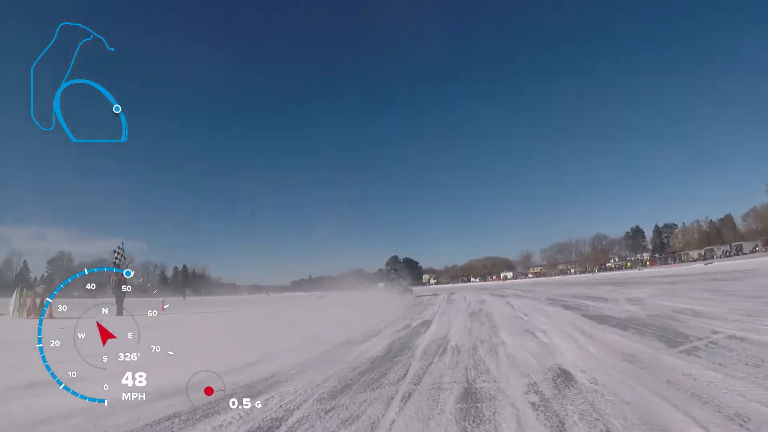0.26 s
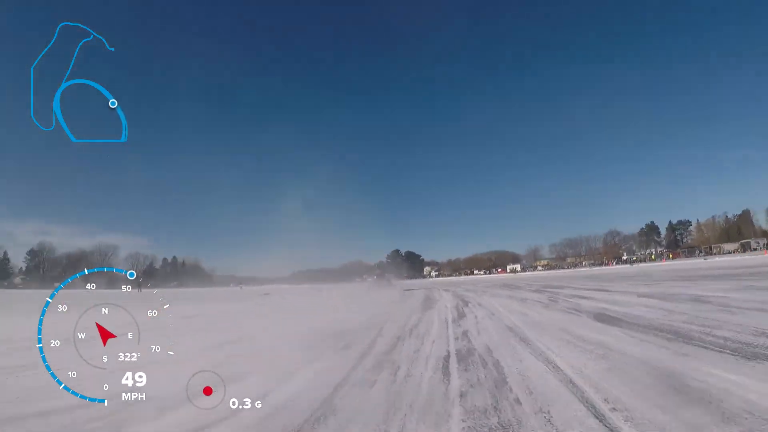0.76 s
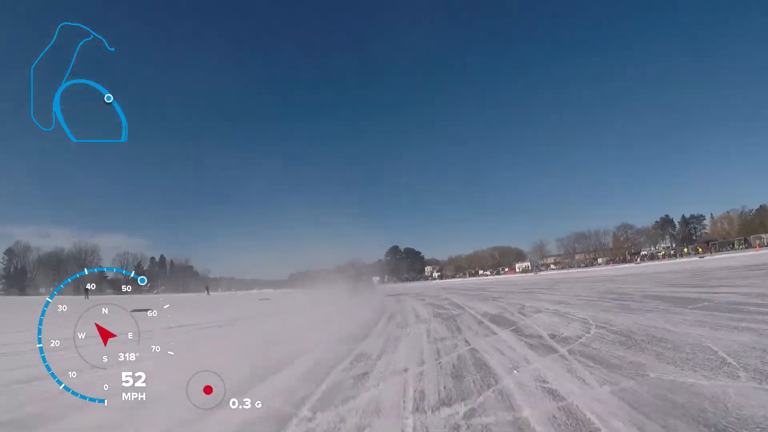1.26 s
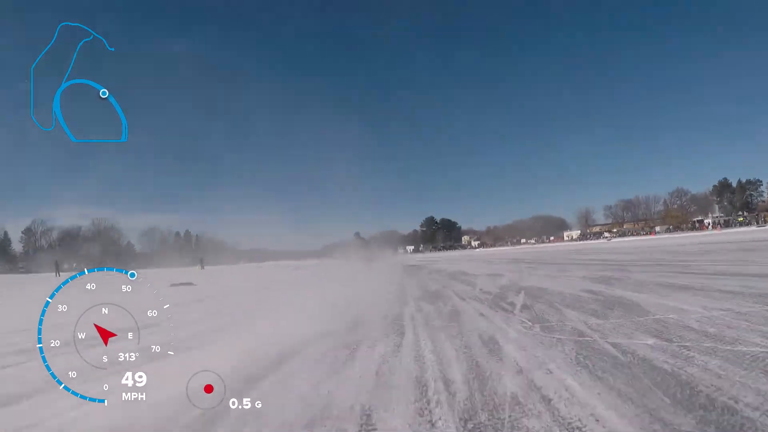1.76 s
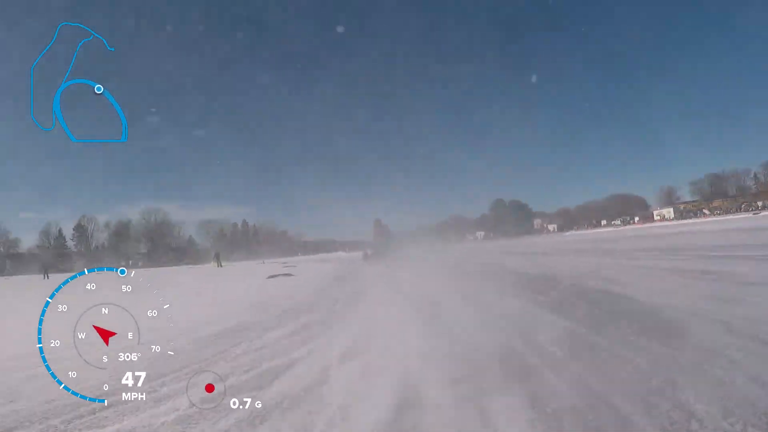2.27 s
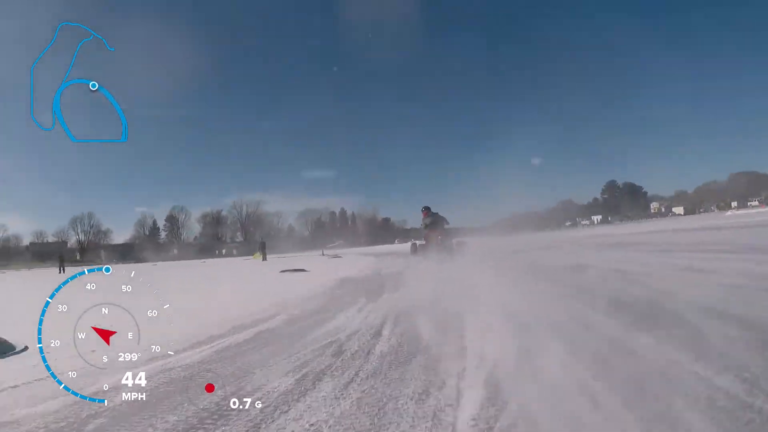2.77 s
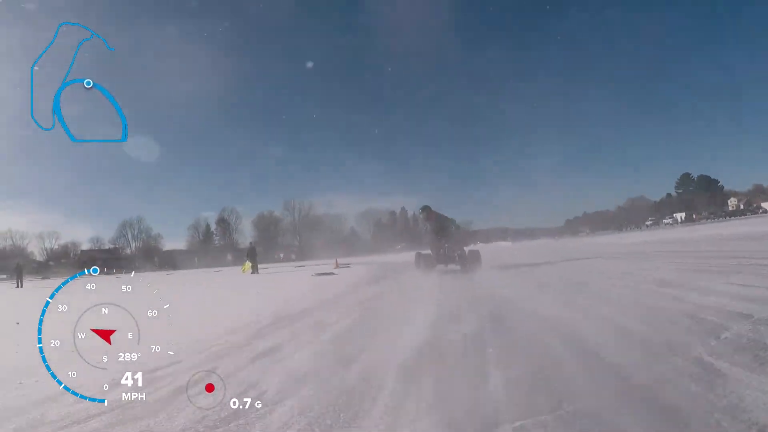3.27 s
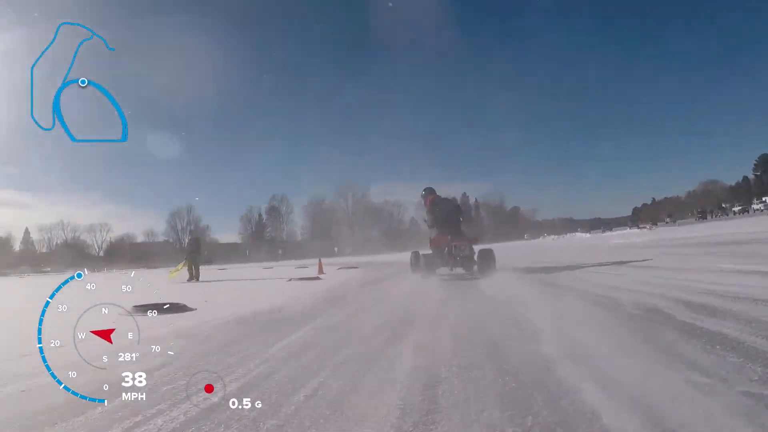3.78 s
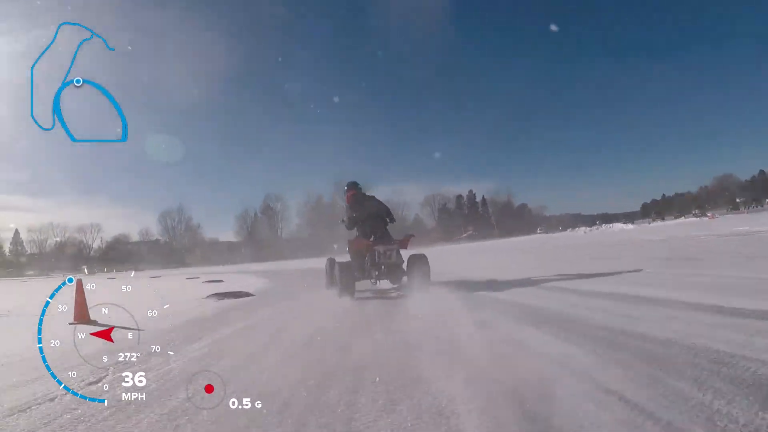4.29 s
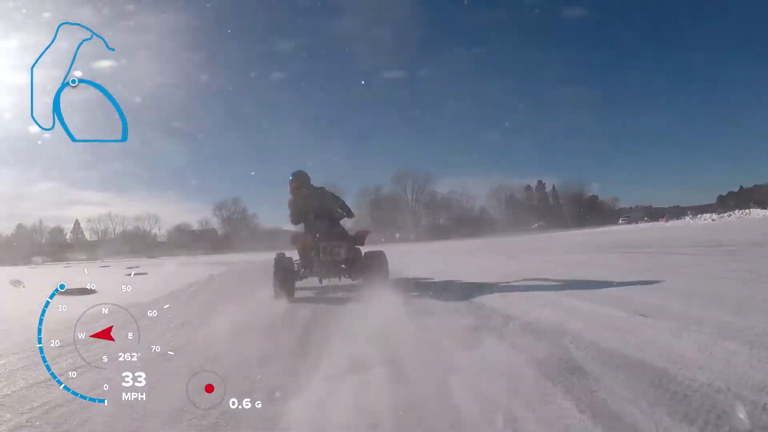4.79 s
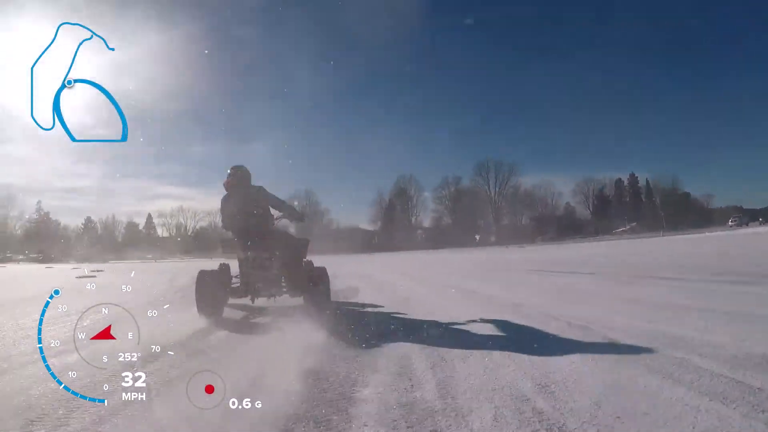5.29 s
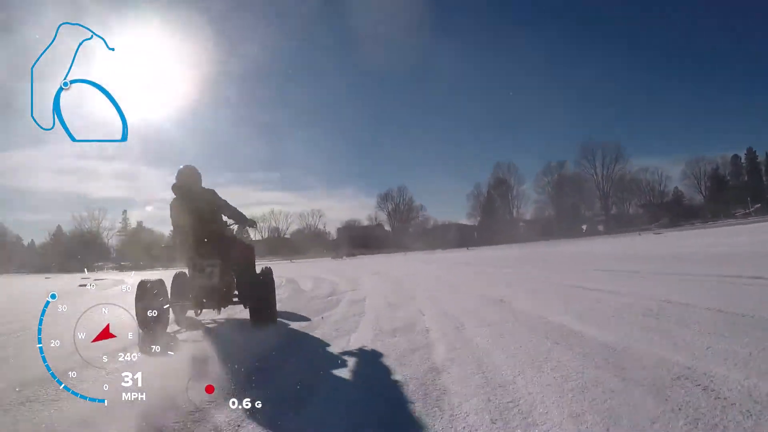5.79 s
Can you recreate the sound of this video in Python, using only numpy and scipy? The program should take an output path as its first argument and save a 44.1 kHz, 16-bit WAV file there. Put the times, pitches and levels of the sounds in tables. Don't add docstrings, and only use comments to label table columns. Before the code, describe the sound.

A racing engine roars at close range outdoors on ice. An early double clunk drops its pitch; it climbs for half a second, then falls off into a ragged, burbling slow-down with a quick wheelspin flare and low stumbles. It ends deep and booming. Metallic ticks, snow-spray hiss and muffled wind buffeting surround it, boxy and compressed in the frame-mounted housing.

```python
import sys
import numpy as np
from scipy import signal
from scipy.fft import rfft, irfft, next_fast_len
from scipy.io import wavfile
from scipy.ndimage import uniform_filter1d, minimum_filter1d

SR = 44100
rng = np.random.default_rng(int(sys.argv[2]) if len(sys.argv) > 2 else 0)


def gain_from_decibels(decibels):
    exponent = np.asarray(decibels, float) / 20
    return 10 ** exponent


def put_to_file(sound):
    columns = np.atleast_2d(sound).T
    safe = np.clip(columns, -1, 1)
    whole_steps = np.round(safe * 32767)
    wavfile.write(sys.argv[1], SR, whole_steps.astype(np.int16))


N = 266805


def rms_one(x):
    return x / np.sqrt(np.mean(x ** 2) + 1e-20)


def in_time(rows):
    s, *columns = np.transpose(rows)
    return [np.interp(np.arange(N) / SR, s, c) for c in columns]


def at_hz(points, hz):
    points = np.array(points)
    return np.interp(np.log(hz), np.log(points[:, 0]), points[:, 1])


def drift(rate_hz):
    pole = np.exp(-80 * np.pi * rate_hz / SR)
    noise = rng.standard_normal(N // 40 + 2002)
    slow = signal.lfilter([1], [1, -2 * pole, pole * pole], noise)[2000:]
    return np.interp(np.arange(N) / 40, np.arange(len(slow)), rms_one(slow))


def colour(x, points):
    size = next_fast_len(N)
    hz = np.maximum(np.arange(size // 2 + 1) * SR / size, 1)
    return rms_one(irfft(rfft(x, size) * gain_from_decibels(at_hz(points, hz)), size)[:N])


def bumps(rows):
    t = np.arange(N) / SR
    return sum(size * np.exp(-2 * ((t - s) / half_s) ** 2) for s, size, half_s in rows)


def order(cycles, k, rough, spread=1):
    wander = (drift(16.) + 1j * drift(16.)) / np.sqrt(2)
    size = np.sqrt(1 - rough ** 2) + rough * wander
    turning = np.exp(2j * np.pi * (k * cycles + spread * rng.random()))
    return np.sqrt(2) * np.real(size * turning)


def engine(firing_hz, cycles, rough, turn_db, third_db, boom_db, growl_db, bark_db):
    # frequency in Hz, level in dB.
    exhaust_colour = [(40, -19), (90, -3.5), (260, -1), (380, 1), (430, 0.5), (530, -1), (640, -9),
                      (800, -4), (950, -14.5), (1100, -15), (1400, -21.5), (1850, -21.5), (2400, -56)]
    out = gain_from_decibels(turn_db - 1.5) * order(cycles, 2, 0.2 * rough)
    out += gain_from_decibels(third_db - 1.0) * order(cycles, 3, 0.39 * rough)
    out += gain_from_decibels(boom_db - .3) * order(cycles, 4, .3 * rough)
    for k in [1, *range(5, 28)]:
        hz = k * firing_hz
        fourth_db = (3.1 * rough + 0.24 * (boom_db + 21.5)) * (k % 4 == 0)
        even_db = 2.87 * (k % 2 == 0) + fourth_db + 1.3 * drift(3.5)
        high = np.clip((hz - 560) / 120, 0, 1)
        high_db = bark_db - 5.0 - 12.0 * np.maximum(rough - .6, 0)
        level_db = (1 - high) * (growl_db - 11.0) + high * high_db
        ragged = np.clip(rough * (0.7 + 0.04 * k) + np.maximum(hz - 1050, 0) / 500, 0, .95)
        gain = gain_from_decibels(level_db + even_db + at_hz(exhaust_colour, hz))
        out += gain * order(cycles, k, ragged, spread=.6)
    return out


def frame_db(k):
    # start in seconds, length in seconds, order, level in dB.
    locks = [(0, 0.24, 2, -17.5), (0, 0.29, 4, -25), (0.37, 0.4, 3, -20.5), (0.357, 0.68, 2, -21.5),
             (0.609, 0.46, 4, -16), (0.785, 0.29, 2, -15), (0.398, .24, 4, -26), (1.099, 0.34, 4, -24.5),
             (1.98, 0.29, 4, -25), (1.506, 0.071, 4, -19), (1.59, .08, 4, -25), (1.68, 0.3, 4, -19),
             (1.866, 0.22, 3, -26), (2.58, 0.19, 4, -20), (2.807, 0.055, 3, -20.5), (2.963, 0.19, 4, -19),
             (3.108, 0.24, 4, -17), (2.946, 0.36, 2, -24.5), (3.396, 0.1, 4, -18), (3.534, 0.31, 2, -24),
             (3.804, 0.26, 4, -17), (3.89, 0.32, 3, -24), (4.065, 0.48, 2, -21.5), (4.095, 0.7, 4, -20),
             (4.7, 1.5, 4, -15), (4.3, .4, 3, -28.5), (4.893, 0.078, 2, -27.5), (5.198, 0.16, 2, -23),
             (5.7, 0.55, 4, -14)]
    loose_db = {2: -31, 3: -33, 4: -30}
    lock_edge_s, loose_wander_db = 0.024, 3.5
    t = np.arange(N) / SR
    gain = gain_from_decibels(loose_db[k] + loose_wander_db * drift(4.9))
    for s, length_s, locked, db in locks:
        if round(locked) == k:
            inside_s = np.minimum(t - s + (s <= 0), s + length_s - t)
            hold = np.clip(.5 + inside_s / lock_edge_s, 0, 1)
            gain = (1 - hold) * gain + hold * gain_from_decibels(db)
    return 20 * np.log10(gain)


def roar(cycles, growl_db, rough):
    # frequency in Hz, level in dB per Hz.
    roar_colour = [(40, -61), (120, -31.5), (250, 0), (320, 5.5), (450, 3), (600, -1), (800, -6.5),
                   (1100, -13), (1900, -14), (3000, -45.5), (6000, -110)]
    puffs = np.exp(-3.5 * (cycles % 1)) + 0.62
    return gain_from_decibels(growl_db - 8.5 + 10.1 * rough) * colour(rng.standard_normal(N) * puffs, roar_colour)


def header(cycles, rough):
    ring_hz, ring_width_hz, ring_db = 1860, 180, -53
    blown = rng.standard_normal(N) * (0.27 + np.exp(-4. * (cycles % 1)))
    edges_hz = [ring_hz - ring_width_hz / 2, ring_hz + ring_width_hz / 2]
    band = signal.butter(2, edges_hz, "band", fs=SR, output="sos")
    pulling = np.clip((.5 - rough) / 0.26, 0, 1)
    return gain_from_decibels(ring_db + 3. * drift(5.)) * pulling * rms_one(signal.sosfilt(band, blown))


def thumps():
    # start in seconds, peak in dB, frame ring in Hz.
    stumbles = [
        (.262, -5, 202),
        (0.287, -20, 200),
        (0.302, -5, 185),
        (.336, -10, 165),
        (1.172, -12, 133),
        (2.06, -10, 80),
        (2.849, -23, 170.3),
    ]
    out, t = np.zeros(N), np.arange(int(.08 * SR)) / SR
    for s, peak_db, hz in stumbles:
        at = round(s * SR)
        envelope = gain_from_decibels(peak_db + 3.5 - 60 * t / 0.077) * np.tanh(t / 0.0053)
        out[at:at + len(t)] += envelope * np.sin(2 * np.pi * hz * t)
    return out


def ticks(cycles, tick_db, rough):
    # frequency in Hz, level in dB per Hz.
    tick_colour = [(1500, -26), (3500, -24), (5000, -0.5), (6500, 5.5), (7600, -3), (10500, -11.5),
                   (11500, -20), (14000, -29), (15500, -63)]
    beat = np.floor(4 * cycles + .05 * drift(50.))
    at = np.flatnonzero(np.diff(beat) > 0)
    pattern_db = np.array([5.5, -17.0, 3.5, -7.0])[beat[at].astype(int) % 4]
    loaded = np.clip((.42 - rough) / .25, 0, 1)
    chance_db = -4.5 * np.log(1 - .88 * rng.random(len(at)))
    clicks = np.zeros(N)
    clicks[at] = gain_from_decibels(chance_db + pattern_db - 5.5 * loaded[at])
    fade = np.exp(-1 / (0.0004 * SR))
    bursts = signal.lfilter([1], [1, -fade], clicks + 1e-18) * rng.standard_normal(N)
    struck = rng.random(N) < (900. + 9000. * loaded) / SR
    rattle = struck * rng.standard_normal(N) * gain_from_decibels(-1.0 + 4.0 * drift(30.))
    return gain_from_decibels(tick_db + 8.0) * colour(bursts + rattle, tick_colour)


def hiss(cycles, hiss_db):
    # frequency in Hz, level in dB per Hz.
    housing_colour = [(300, -63.5), (1000, -0.5), (1330, -7), (1860, -5.5), (2400, -6.5), (3300, -18.5),
                      (4170, -13.5), (4730, -5.5), (5990, -5), (6850, -10.5), (7700, -23.5), (10300, -28),
                      (11500, -39.5), (15200, -61)]
    grit = rng.standard_normal(N) * gain_from_decibels(1.7 * drift(180.0) + 0.27 * drift(18.0))
    throb = 1 + 0.13 * np.cos(4 * np.pi * cycles) + 0.064 * np.cos(2 * np.pi * cycles)
    return gain_from_decibels(hiss_db + 2.5) * colour(grit * throb, housing_colour)


def knocks():
    # start in seconds, peak in dB.
    chips = [
        (4.575, -36),
        (4.651, -32.5),
        (5.245, -44),
    ]
    t, snaps = np.arange(N) / SR, 0
    for s, peak_db in chips:
        snaps = snaps + gain_from_decibels(peak_db) * (t >= s) * np.exp(-np.abs(t - s) / .0012)
    burst = snaps * rng.standard_normal(N)
    snap_colour = [(3000, -34), (6500, -6), (8500, -8), (11500, 0), (13300, -9), (14200, -50)]   # Hz, dB
    return np.std(burst) * colour(burst, snap_colour)


def wind(wind_db):
    # frequency in Hz, level in dB per Hz.
    wind_colour = [(15, -26), (30, -11), (65, 0.5), (120, -1), (250, -3.5), (330, -9), (450, -14.5),
                   (800, -26), (1500, -52), (5000, -120)]
    lumps = gain_from_decibels(1.56 * drift(6.7) + 1.67 * drift(60.0))
    return gain_from_decibels(wind_db + 6.0) * colour(rng.standard_normal(N) * lumps, wind_colour)


def slip(bright):
    # frequency in Hz, level in dB.
    slip_rings = [(1750, -41), (4450, -43), (6700, -43)]
    slip_s, slip_length_s = 4.402, .011
    t = np.arange(N) / SR
    gap = np.exp(-((t - slip_s) / slip_length_s * 2) ** 4)
    wide = np.exp(-((t - slip_s) / slip_length_s) ** 4)
    rings = sum(gain_from_decibels(db) * np.sin(2 * np.pi * hz * t) for hz, db in slip_rings)
    return bright * (1 - 0.98 * gap) + wide * rings


def scene():
    # time in seconds, firings per second.
    speed = [(0, 88.2), (.22, 89), (.33, 68.5), (.67, 72.2), (.89, 77), (1.05, 72), (1.22, 60.8),
             (1.55, 64), (1.8, 65), (2.0, 57.8), (2.66, 54.3), (2.95, 54.5), (3.15, 49.6), (3.34, 48.8),
             (3.4, 54), (4.3, 54.3), (4.68, 50.8), (6.05, 50.8)]
    # centre in seconds, extra firings per second, half length in seconds.
    spins = [
        (1.63, 10.5, 0.072),
        (2.86, 1.78, .1),
        (3.72, 5., .13),
        (4.9, 3, .15),
        (5.15, 1.7, .3),
        (5.45, -0.44, .2),
    ]
    # time in seconds, roughness 0-1.
    unevenness = [(0, .16), (.235, .18), (.262, .85), (.35, .85), (.41, .22), (1.05, .2), (1.12, .6),
                  (2.5, .55), (3.75, .55), (3.9, .45), (4.7, .5), (4.9, .5), (6.05, .45)]
    # time in seconds, level in dB.
    throttle = [(0, -29.5), (.21, -25.5), (.28, -43), (.36, -30.5), (.68, -29), (.98, -31.5), (1.15, -54),
                (1.6, -42.5), (1.95, -43.5), (2.45, -34), (2.7, -36.5), (2.88, -32), (3.35, -43),
                (3.62, -33), (3.9, -39.5), (4.4, -35), (4.88, -38.5), (6.05, -44.5)]
    # time in seconds, level in dB.
    gusts = [(0, -36), (.3, -30.5), (.38, -28), (.6, -30), (1.1, -27), (1.95, -29), (2.4, -26),
             (3.3, -26.5), (3.77, -28), (3.96, -30.5), (4.35, -30), (4.85, -30.5), (5.7, -31),
             (6.05, -36.5)]
    # time in seconds, housing hiss in dB.
    shake = [(0, -39), (.245, -38), (.27, -43), (.42, -43.5), (.79, -37.5), (1.06, -39.5), (1.3, -45),
             (1.57, -43.5), (1.95, -44.5), (2.9, -39), (3.15, -41), (3.8, -38), (4.0, -40), (4.55, -38),
             (4.85, -39.5), (5.05, -39.5), (5.5, -41), (6.05, -41.5)]
    # centre in seconds, change in dB, half length in seconds.
    jolts = [(.365, 2.5, .015), (1.07, 4, .015), (1.115, -5, 0.019), (1.2, -4., 0.015), (1.255, 4, 0.015),
             (1.85, 4, 0.065), (3.1, 1, .03), (3.47, 3., 0.053), (3.51, -2, 0.044), (4.02, -2.5, .02),
             (4.055, 2, .015), (4.3, 0.5, .02), (4.84, 2, 0.0092)]

    firing_hz = in_time(speed)[0] + bumps(spins)
    cycles = np.cumsum(firing_hz) / SR
    rough, bark_db, wind_db = in_time(unevenness)[0], in_time(throttle)[0], in_time(gusts)[0]
    growl_db = -28.5 + 0.32 * (bark_db + 38) + .6 * drift(5.3)
    hiss_db = in_time(shake)[0] + bumps(jolts)
    tick_db = -54.5 + 1.9 * (hiss_db + 41) + 1.5 * drift(21.0)

    low_orders_db = [frame_db(k) for k in range(2, 5)]
    low = engine(firing_hz, cycles, rough, *low_orders_db, growl_db, bark_db)
    low = low + roar(cycles, growl_db, rough) + thumps() + wind(wind_db)
    bright = ticks(cycles, tick_db, rough) + hiss(cycles, hiss_db) + knocks() + header(cycles, rough)
    highpass = signal.butter(3, 1000, "high", fs=SR, output="sos")
    thin = signal.sosfiltfilt(highpass, low)
    return (low - thin + slip(bright + thin))[None]


def top_cut(x):
    return signal.sosfilt(signal.butter(12, 15300, fs=SR, output="sos"), x)


def record(dry):
    limit_db, release_db_s = -8.5, 59
    over_db = np.maximum(20 * np.log10(np.abs(dry[0]) + 1e-9) - limit_db, 0)
    ramp = release_db_s * np.arange(N) / SR
    held_db = np.maximum.accumulate(over_db + ramp) - ramp
    cut_db = uniform_filter1d(-minimum_filter1d(-held_db, size=129), size=129)
    return top_cut(dry * gain_from_decibels(-cut_db))


dry = scene()
out = record(dry)
put_to_file(out)
```